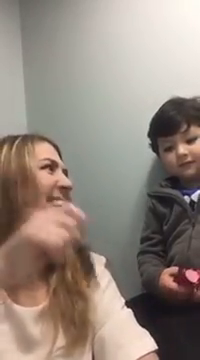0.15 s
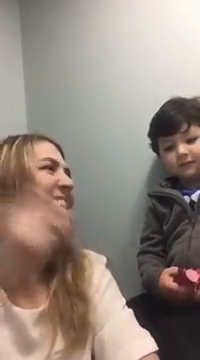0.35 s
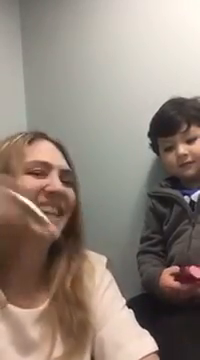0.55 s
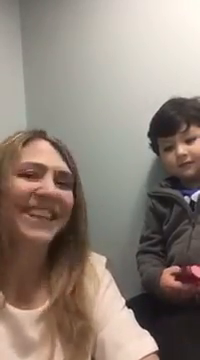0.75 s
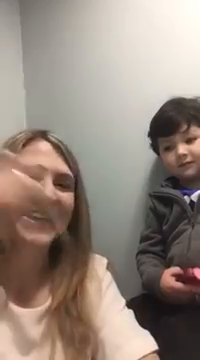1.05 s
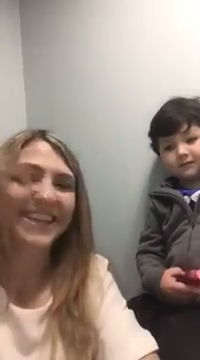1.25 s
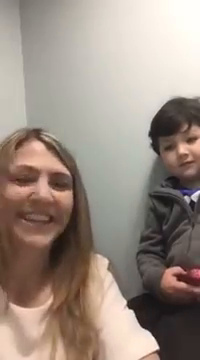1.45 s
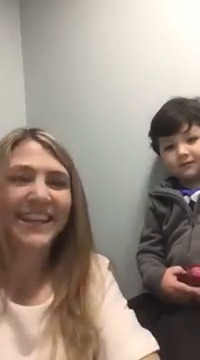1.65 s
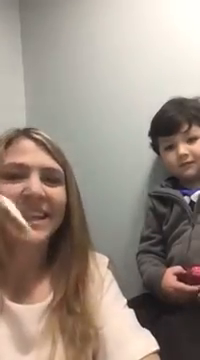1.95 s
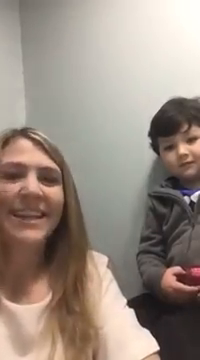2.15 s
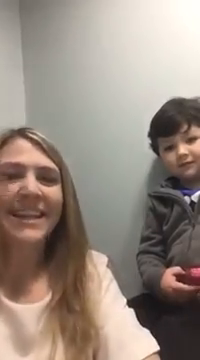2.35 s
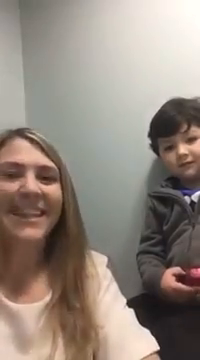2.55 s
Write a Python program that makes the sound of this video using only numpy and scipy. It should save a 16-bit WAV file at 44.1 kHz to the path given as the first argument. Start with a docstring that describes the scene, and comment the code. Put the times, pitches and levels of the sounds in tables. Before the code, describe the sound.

A small plastic tube of liquid is shaken hard, clacking in a quick, even rhythm.

```python
"""A small plastic tube of liquid, shaken hard at about six strokes a second, close up in a small room.
Each stroke ends in a sharp clack: a graze, a hard contact and a short chatter ring the tube, then drops land.
On some return strokes the contents rub along the wall in a soft rattle.
Close walls answer every clack; faint handling bumps and a quiet room hum lie underneath."""
import sys
import numpy as np
from scipy import signal
from scipy.fft import rfft, irfft, next_fast_len
from scipy.io import wavfile

SR = 44100
rng = np.random.default_rng(int(sys.argv[2]) if len(sys.argv) > 2 else 0)


def int16_out(signal):
    """Quantize to a 16-bit WAV file."""
    q = np.round(np.clip(np.atleast_2d(signal).T, -1, 1) * 32767)
    wavfile.write(sys.argv[1], SR, q.astype(np.int16))


N = 119070
SIZE = 2048  # samples in one contact sound
HZ = np.fft.rfftfreq(SIZE, 1 / SR)
T = np.arange(SIZE) / SR


# the tube's plastic ring (frequency [Hz], width [Hz], level [dB])
TUBE_MODES = [(1555, 362, -7.5), (3086, 263, -3), (4265, 1060, 1), (7265, 436, 0.5), (7920, 1100, -5.5),
              (9950, 1110, -8.5), (11850, 1800, -18.5), (14100, 740, -9.5)]
# EQ of the unpitched crack (frequency [Hz], level [dB])
CRACK_EQ = [(300, 22), (900, -37), (1350, -46), (1750, -7), (2500, -13), (3400, -11.5), (4800, -22.5),
            (6500, -4.5), (9500, -11.5), (12400, -18), (15000, -39)]
# one clack a stroke (time [s], level [dB], main ring [Hz], main ring [dB], hollow body [dB],
# brightness [dB], crack [dB], chatter [dB], far end's share [0-1])
CLACK_HITS = [(0.1056, -32.5, 5400, 2, 2.5, -3.5, -20, -2.5, 0.12),
              (0.2796, -28.5, 5600, 4.5, 3.5, -2.5, -32, -13, 0.48),
              (0.444, -26.5, 5230, 3.5, 0, 6, -4, 9, 0.5),
              (0.626, -25.5, 5450, -1.5, -4.5, 4.5, -20, -7.5, 1),
              (0.7937, -25.5, 5370, 5.5, -2.5, 9, -2.5, -8, 0.9),
              (.9699, -26.5, 5650, 4, -1.5, 7.5, -2.5, -13.5, .45),
              (1.1398, -25, 5550, 8.5, -1.5, 11, 2.5, -7, 0.34),
              (1.307, -24.5, 7100, 4.5, 3, 4, 11, 9.5, 0.1), (1.4805, -26, 5960, 7, 6, 1.5, 4.5, 5.5, 0),
              (1.6733, -24, 5550, 8.5, -2, 9.5, 2, -9, 0.19),
              (1.8648, -32.5, 5500, -1, -7.5, -4.5, -37, -22.5, 1),
              (2.0228, -22.5, 6820, 13.5, 9, 9, 6.5, -3.5, 0.03),
              (2.2045, -21.5, 5960, 11, 3.5, 7.5, 5, -8, 0.53),
              (2.383, -30, 5380, -0.5, -4.5, -3.5, -30, -20, 1),
              (2.55, -27.5, 5830, 7, -1, 3, 8.5, -7, 0.3)]


def clacks():
    """The end of each stroke: a light graze, one hard contact and a short chatter ring the tube."""
    graze_lead_s, chatter_gap_s = 0.0021, 0.001203
    main_q, body_hz, low_cut_hz = 8, 3240, 1314
    track = np.zeros(N)
    modes = sum(amp(db) ** 2 * resonance(hz, width) for hz, width, db in TUBE_MODES)
    low_cut_gain = 1 / np.sqrt(1 + (low_cut_hz / (HZ + 100)) ** 10)  # the hits carry little below about 1.3 kHz
    for s, db, main_hz, main_db, body_db, bright_db, crack_db, chatter_db, far_share in CLACK_HITS:
        main_ring = amp(main_db) ** 2 * resonance(main_hz, main_hz / main_q)
        pitched = modes * treble(bright_db) ** 2 + main_ring
        crack = amp(along(CRACK_EQ, HZ) + crack_db) ** 2
        body_shelf = amp(body_db / (1 + (HZ / body_hz) ** 8))
        colour = np.sqrt(pitched + crack) * body_shelf * low_cut_gain
        hit = contact(life_s=0.00055)
        chatter = amp(chatter_db) * contact(life_s=0.00226)
        graze = amp(-13.5) * contact(life_s=0.0011)
        blow = hit + np.roll(chatter, round(chatter_gap_s * SR))
        push = graze + np.roll(blow, round(graze_lead_s * SR))
        play(track, s - graze_lead_s, db, ring(push, colour), far_share)
    return track


def contact(life_s):
    """A rough contact: a brief burst of force with a nearly even spectrum."""
    push = rng.standard_normal(SIZE) * np.exp(-T / life_s)
    for _ in range(4):  # flatten the spectrum, then tighten the tail
        spectrum = rfft(push)
        push = irfft(spectrum / (abs(spectrum) + 1e-9)) * np.exp(-(T / (4 * life_s)) ** 2)
    return norm(push)


def ring(push, gain):
    """A short push rings a minimum-phase body with the given gain at each frequency."""
    cepstrum = irfft(np.log(np.maximum(gain, 1e-6)))
    cepstrum[1:SIZE // 2] *= 2
    cepstrum[SIZE // 2 + 1:] = 0
    return irfft(np.exp(rfft(cepstrum)) * rfft(push))


def resonance(hz, width_hz):
    """Power response of one resonance with steep skirts."""
    return 1 / (1 + ((HZ - hz) / (0.93 * width_hz)) ** 2) ** 2


def treble(db, corner_hz=7400):
    """A high shelf that brightens or dulls a contact."""
    return amp(db / (1 + (corner_hz / (HZ + 1)) ** 8))


def splash(drops=8, span_s=0.08, drop_db=-22.5, fade_db_per_s=104):
    """Impulses for the blow itself, then a few drops hitting the tube wall, the later ones softer."""
    landing_s = rng.uniform(0.15, 1, drops) * span_s
    sizes = amp(drop_db - fade_db_per_s * landing_s) * rng.standard_normal(drops)
    return np.bincount(np.r_[0, (landing_s * SR).astype(int)], np.r_[1, sizes])


# EQ of a soft rattle (frequency [Hz], level [dB])
RATTLE_EQ = [(800, -25), (1600, -20.5), (2550, -9.5), (3100, 1), (3700, -8.5), (4600, -1), (5600, -10),
             (6700, -11.5), (8000, -10.5), (9500, -16.5), (11300, -15.5), (15000, -24)]
# soft rattles on the return strokes (time [s], level [dB], brightness [dB], decay [s])
RATTLE_HITS = [(.001, -53, -6.5, 0.0046), (0.14, -53, -5, 0.011), (0.166, -42, -2.5, 0.0071),
               (0.356, -44.5, -11, .016), (0.391, -51.5, -20, 0.027), (0.429, -47.5, -5, 0.01),
               (0.509, -48, 7, 0.019), (.5365, -38, 1, 0.0023), (1.4085, -44.5, 0.5, 0.0054),
               (1.552, -50.5, -11, 0.0074), (2.454, -52, -4, .008), (2.6337, -48.5, 1.5, 0.0027)]


def rattles(attack_s=0.0013, grit_db=3):
    """On the way back the contents rub along the wall in a soft, gritty swell."""
    track = np.zeros(N)
    colour = amp(along(RATTLE_EQ, HZ))
    for s, db, bright_db, decay_s in RATTLE_HITS:
        grit = amp(grit_db * rng.standard_normal(SIZE)) * rng.standard_normal(SIZE)
        swell = (1 - np.exp(-T / attack_s)) * np.exp(-T / decay_s) * (1 - T / T[-1])
        play(track, s, db, ring(grit * swell, colour * treble(bright_db)))
    return track


def play(track, s, db, sound, far_share=0):
    """Play a contact and its splash into the room at a time and level."""
    level_window_s = 0.0025  # the contact carries the energy of this long a burst at its level
    splashed = signal.fftconvolve(norm(sound), splash())
    heard = signal.fftconvolve(splashed, room(far_share)) * amp(db) * np.sqrt(level_window_s * SR)
    start = max(round(s * SR), 0)
    track[start:start + len(heard)] += heard[:N - start]


# early reflections off the close walls (delay [s], level [dB])
REFLECTIONS = [(.0032, -7.5), (.0065, -14), (0.0116, -13)]
# reverb decay (frequency [Hz], time to fall 60 dB [s])
REVERB_T60 = [(1000, 0.37), (2600, 0.18), (5000, 0.22), (8000, 0.18), (14000, 0.19)]
# reverb EQ (frequency [Hz], level [dB])
REVERB_EQ = [(1000, -6.5), (2000, 0), (3500, 2), (4700, 3.5), (5800, 0), (7500, 1), (10300, 2.5),
             (11600, 0), (12600, 5.5), (14000, 0)]


def room(far_share, tail_db=-3, predelay_s=0.0035, build_s=0.00087, grain_db=2):
    """The tube's ends radiate in opposite phase, sounding hollow; walls and a grainy tail answer."""
    hz, t, noise = signal.stft(rng.standard_normal(SR // 2), SR, nperseg=256)
    fade_db = along(REVERB_EQ, hz)[:, None] - 60 * t / along(REVERB_T60, hz)[:, None]
    flicker_db = grain_db * rng.uniform(-1.16, 1, len(t))
    tail = signal.istft(noise * amp(fade_db + flicker_db), SR, nperseg=256)[1]
    fade_in = 1 - np.exp(-np.arange(len(tail)) / SR / build_s)
    response = np.pad(amp(tail_db) * norm(tail * fade_in), (round(predelay_s * SR), 0))
    for s, db in REFLECTIONS:
        response[int(s * SR * rng.uniform(0.9, 1.1))] += amp(db)
    tube_length_m, sound_m_per_s = 0.155, 343
    far_end_lag = round(tube_length_m / sound_m_per_s * SR)
    response[[0, far_end_lag]] += norm(np.array([1, -far_share]))
    return response


# soft, low handling bumps (time [s], level [dB])
HANDLING_BUMPS = [(2.25, -64), (2.42, -65.5), (2.63, -75)]


def bumps(centre_hz=77.5, width_s=0.032):
    """The last strokes jog the microphone a little."""
    t = np.arange(N) / SR
    rumble = noise_bed(lambda hz: np.exp(-(3 * (hz / centre_hz - 1)) ** 2))
    return rumble * sum(amp(db) * np.exp(-((t - s) / width_s) ** 2) for s, db in HANDLING_BUMPS)


# EQ of the room tone (frequency [Hz], level [dB])
HUM_EQ = [(15, -47), (28, -10), (55, 1), (120, 1), (220, -2.5), (450, -6), (811, -7.5), (1460, -9.5),
          (2000, -6), (2560, -14), (3100, -9), (5500, -12), (7300, -20), (9000, -17), (15000, -32)]


def hum(level_db=-67.5):
    """Room tone: steady, quiet noise weighted to the lows."""
    return amp(level_db) * noise_bed(lambda hz: amp(along(HUM_EQ, hz)))


def noise_bed(gain):
    """A full track of coloured noise at unit RMS."""
    return np.sqrt(N) * norm(filtered(rng.standard_normal(N), gain))


def filtered(x, gain):
    """A whole track through a gain that depends on frequency."""
    size = next_fast_len(N + 8192)
    return irfft(rfft(x, size) * gain(np.fft.rfftfreq(size, 1 / SR)), size)[:N]


def amp(db):
    """Decibels to gain."""
    return 10 ** (np.asarray(db) / 20)


def along(points, hz):
    """A curve of (frequency, value) points, read on a log frequency axis."""
    freqs, values = np.transpose(points)
    return np.interp(np.log(hz + 1), np.log(freqs + 1), values)


def norm(x):
    """Scale to unit energy."""
    return x / np.sqrt(np.sum(x ** 2) + 1e-20)


def scene():
    """The shaken tube over handling bumps and room tone, in mono."""
    return (clacks() + rattles() + bumps() + hum())[None]


def record(dry):
    """The microphone keeps nothing above its band limit."""
    top_hz, rolloff_hz = 15100, 250
    return filtered(dry[0], lambda hz: np.clip((top_hz - hz) / rolloff_hz, 0, 1))[None]


dry = scene()
out = record(dry)
int16_out(out)
```